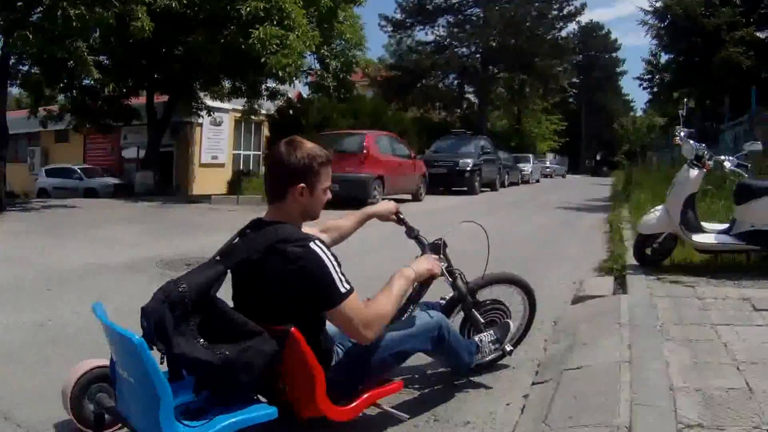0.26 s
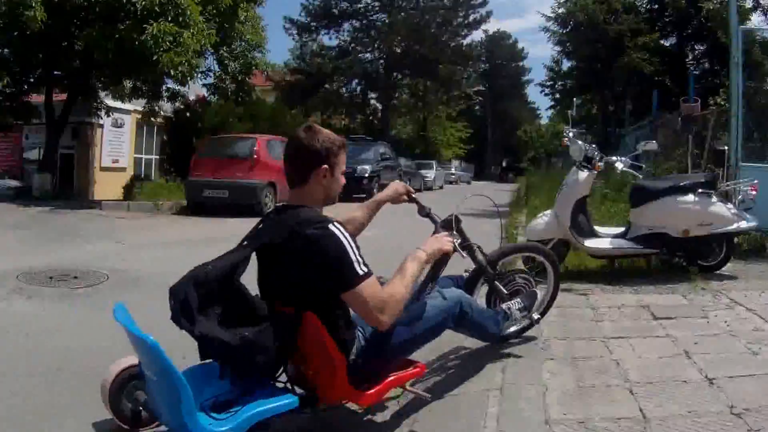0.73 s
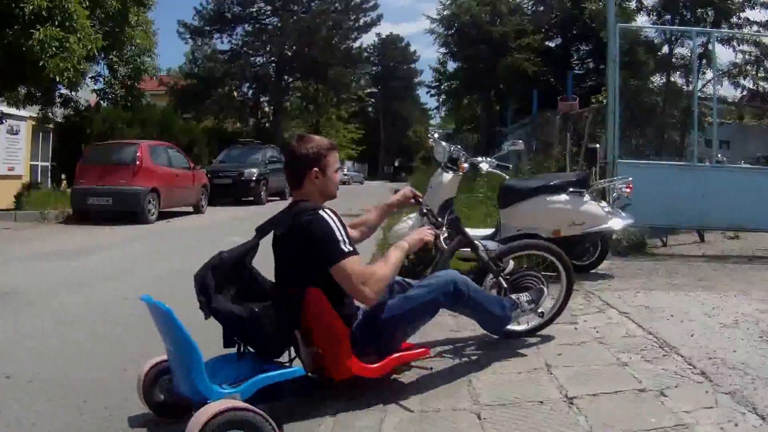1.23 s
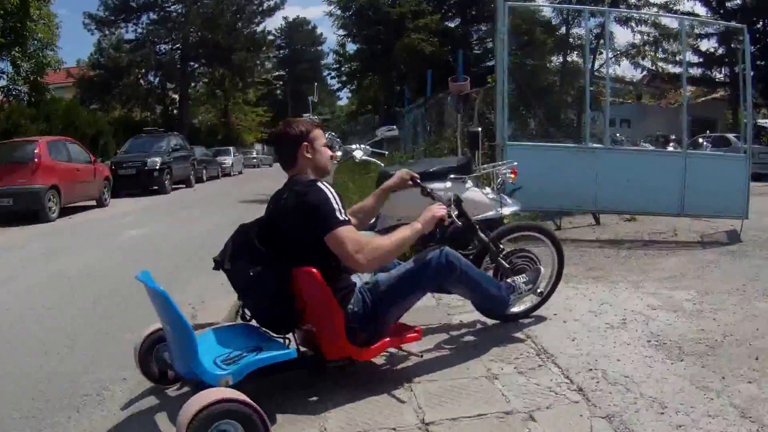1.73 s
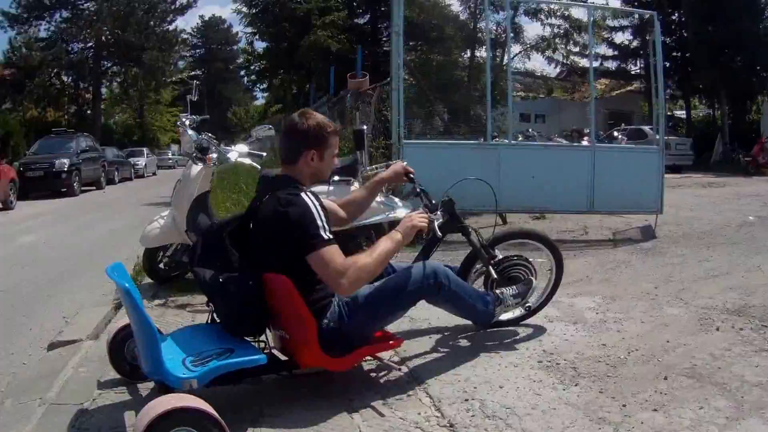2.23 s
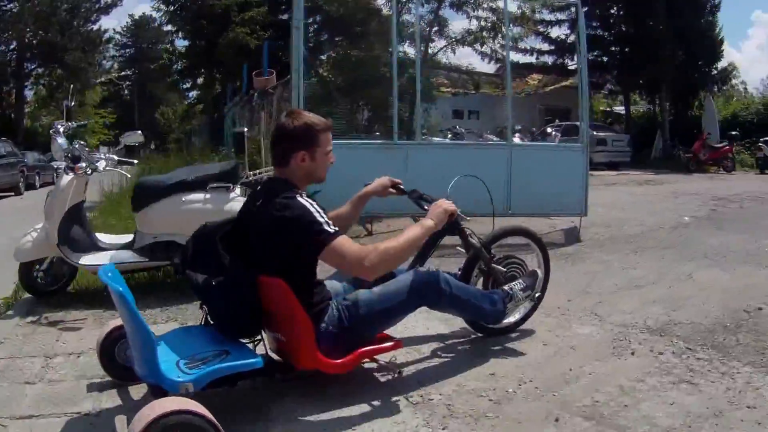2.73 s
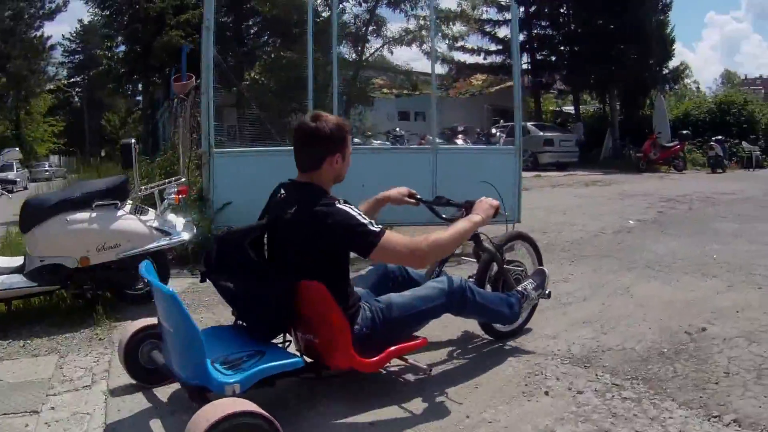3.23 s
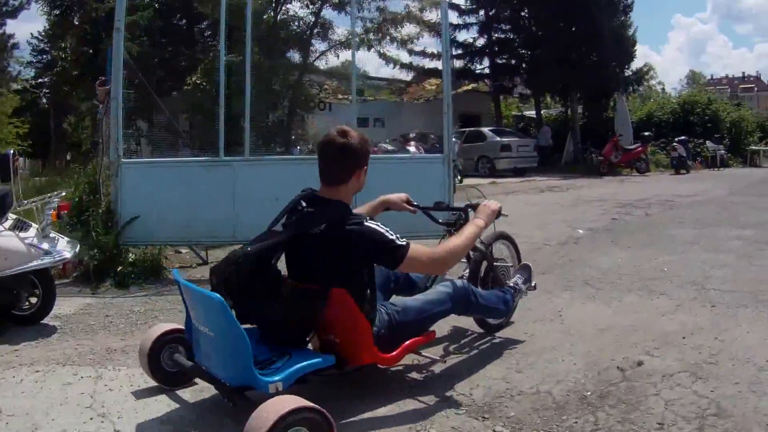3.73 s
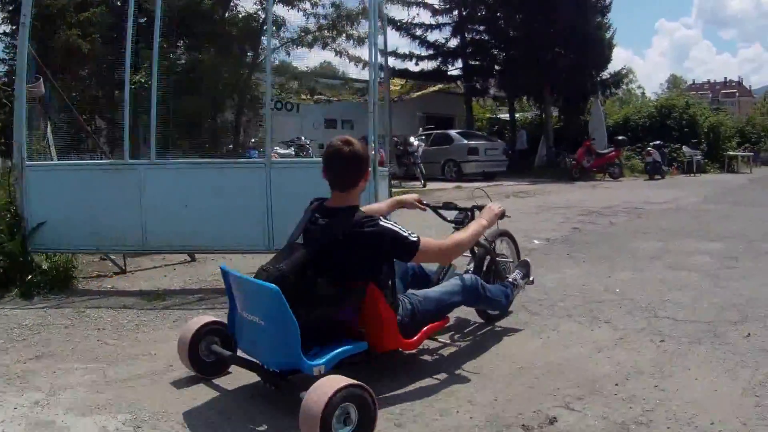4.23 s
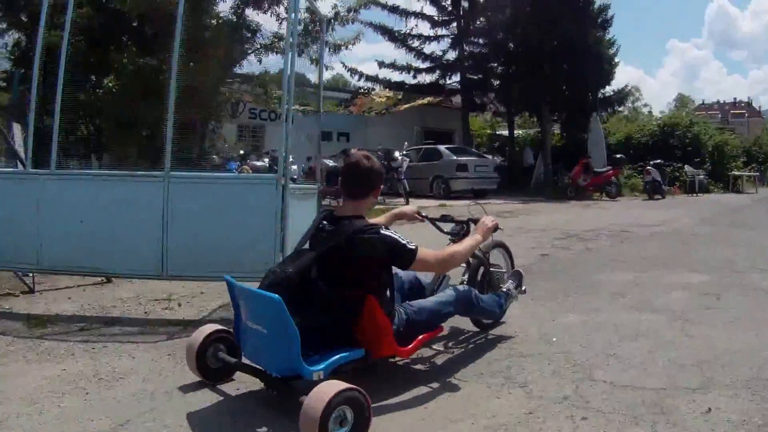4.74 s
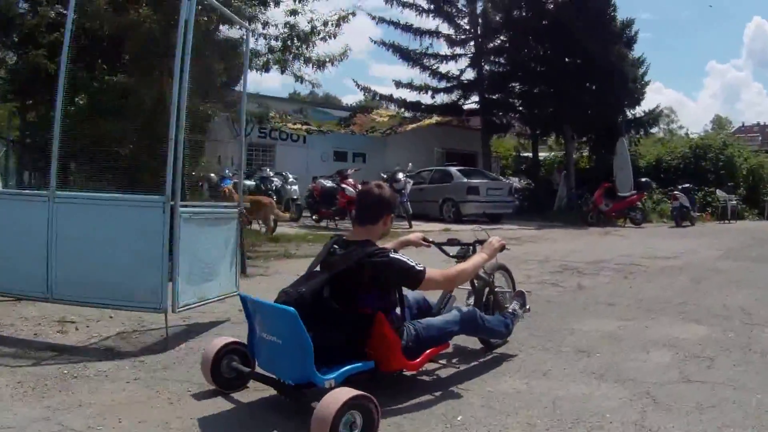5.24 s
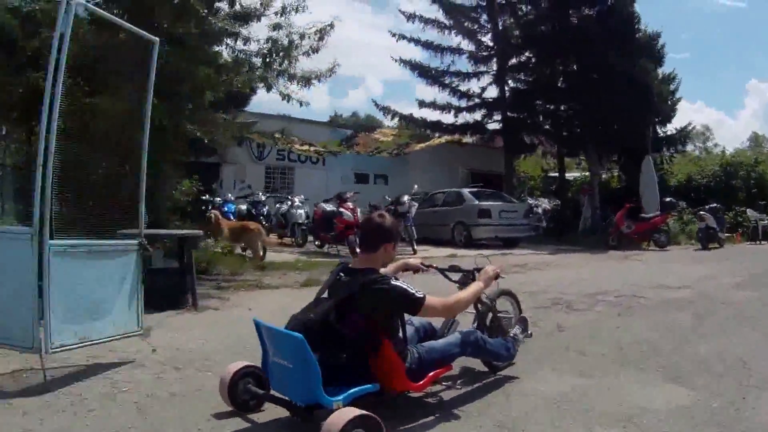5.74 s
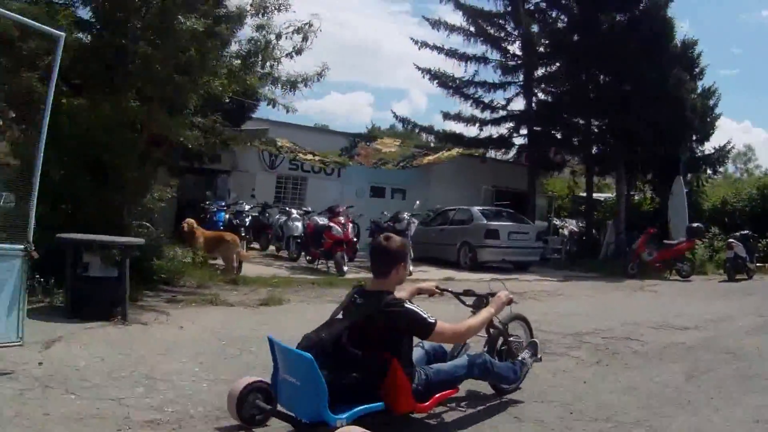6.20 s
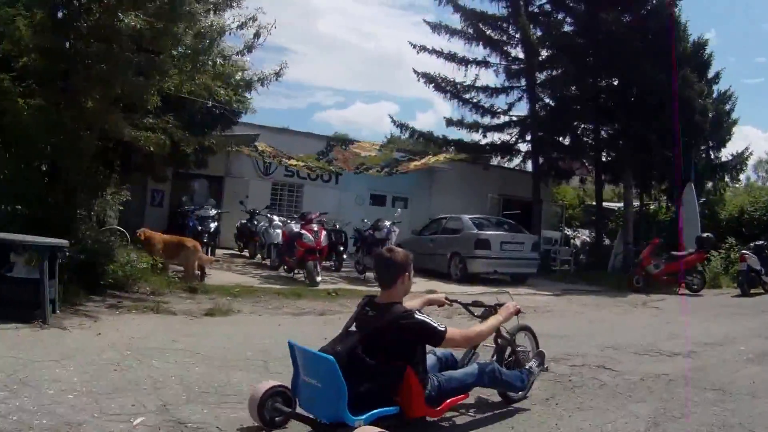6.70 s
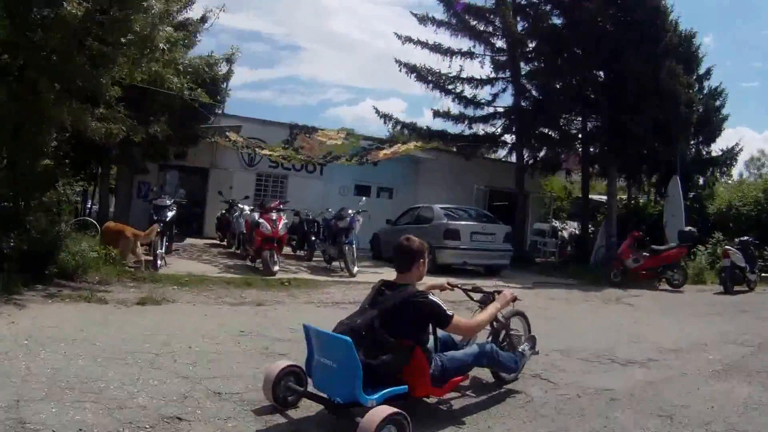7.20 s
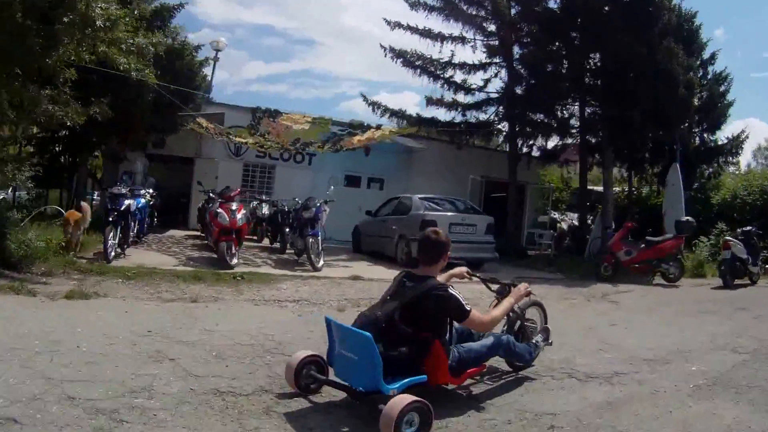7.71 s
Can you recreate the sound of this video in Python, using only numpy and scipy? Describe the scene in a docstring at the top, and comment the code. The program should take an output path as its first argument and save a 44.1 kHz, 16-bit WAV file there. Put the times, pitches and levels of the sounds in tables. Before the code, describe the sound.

A trike on hard hollow plastic wheels rolls slowly over paving then gritty asphalt, with boxy knocks, grit cracks and sandy crackle in an open lot.

```python
"""A trike on hard hollow plastic wheels rolls slowly over paving and gritty asphalt, a few steps away.
Bumps push the wheels, whose modes ring as decaying sines; smaller taps keep the same modes rumbling.
Grit cracks and fine sand crackles, both as noise through resonances; a scrap of metal pings once.
Behind it the open lot hums as shaped noise, with a low drone and a thin whine near 8 kHz."""
import sys
import numpy as np
from scipy import signal
from scipy.fft import rfft, irfft
from scipy.io import wavfile
from scipy.ndimage import uniform_filter1d

SR = 44100
rng = np.random.default_rng(int(sys.argv[2]) if len(sys.argv) > 2 else 0)


def file_out(sig):
    """Save sig as 16-bit WAV at sys.argv[1]."""
    # one column per channel
    cols = np.atleast_2d(sig).T
    # limit, then scale
    lim = np.clip(cols, -1, 1)
    pcm = np.round(lim * 32767).astype(np.int16)
    wavfile.write(sys.argv[1], SR, pcm)


N = 351036  # length in samples

# Ways the hollow wheel likes to ring. Each row: pitch in Hz, strength in dB against the other rows,
# time in seconds to fade by 60 dB (knocks fade a little faster, the rumble uses it to set its widths).
WHEEL_MODES = [(274, -29, 0.037), (410, -53, 0.0088), (468, 4, 0.031), (524, 0.5, 0.021),
               (678.3, 8.5, 0.035), (790, 2.5, 0.047), (914, 10.5, 0.01), (1152, 4.5, 0.036),
               (1502, 6, 0.02), (1800, 7.5, 0.005), (2200, -18, 0.017)]
# The larger bumps that knock the wheels.
# Each row: start in seconds, peak in dB before the bass is cut, pitch heard in Hz.
LARGE_BUMPS = [(0.057, -26, 730), (0.218, -33, 930), (0.474, -20.5, 760), (0.642, -22, 600),
               (0.892, -25.5, 630), (1.029, -4, 645), (1.0295, -10, 1930), (1.038, -18.5, 890),
               (1.065, -23, 700), (1.086, -27, 724), (1.224, -15.5, 680), (1.489, -24, 545),
               (1.581, -6, 650), (1.598, -24, 646), (1.612, -4.5, 566), (1.636, -35, 520),
               (1.662, -13.5, 540), (1.712, -14.5, 525), (1.729, -19, 540), (1.916, -33, 1040),
               (2.013, -36, 1130), (2.112, -33, 1120), (2.21, -27, 1130), (2.248, -27.5, 625),
               (2.259, -27, 680), (2.349, -30.5, 1150), (2.484, -31, 910), (2.631, -29.5, 730),
               (2.828, -27.5, 560), (2.892, -28, 560), (3.154, -17.5, 746), (3.163, -7, 643),
               (3.173, -7.5, 666), (3.409, -19, 990), (3.447, -22, 756), (3.58, -16.5, 750),
               (3.628, -25, 695), (3.724, -11, 635), (3.748, -10, 640), (3.832, -8.5, 600),
               (3.848, -30, 652), (3.869, -8.5, 590), (4.121, -22.5, 620), (4.139, -16.5, 670),
               (4.147, -29, 740), (4.158, -13, 565), (4.167, -20, 704), (4.264, -21.5, 720),
               (4.306, -13, 620), (4.316, -25, 720), (4.576, -12.5, 540), (4.586, -16, 670),
               (4.953, -13.5, 636), (5.101, -13, 564), (5.113, -29, 716), (5.233, -21, 640),
               (5.251, -18.5, 850), (5.27, -24, 710), (5.783, -20, 580), (5.799, -20.5, 680),
               (5.823, -15, 645), (6.065, -16.5, 716), (6.117, -22, 790), (6.179, -13, 640),
               (6.196, -5.5, 580), (6.252, -14.5, 600), (6.281, -20, 580), (6.409, -23.5, 700),
               (6.428, -5.5, 664), (6.438, -21, 670), (6.63, -18, 470), (6.942, -9.5, 600), (7.31, -9, 640),
               (7.387, -16.5, 596), (7.396, -8.5, 634), (7.444, -13.5, 595), (7.453, -14.5, 656),
               (7.462, -16.5, 600), (7.574, -8, 660), (7.644, -18, 530), (7.702, -20.5, 536),
               (7.752, -20.5, 560), (7.818, -23.5, 660), (7.831, -20, 716), (7.865, -9.5, 640),
               (7.902, -21, 660)]
PUSH_MS, PUSH_AT_HZ = 0.22, 655  # width of the push for a bump of this pitch


def knocks(rumble_db):
    """Each bump pushes the wheel and rings mostly the modes near its pitch; also gives the shudder after it."""
    bumps = LARGE_BUMPS + small_bumps(rumble_db)
    out, shudder = np.zeros(N), np.zeros(N)
    t = np.arange(int(.1 * SR)) / SR
    hz, mode_db, t60 = np.transpose(WHEEL_MODES)[:, :, None]
    chance = rng.standard_normal((len(bumps), 2, len(WHEEL_MODES), 1))
    for (s, db, pitch_hz), (detune, uneven) in zip(bumps, chance):
        octaves_away = np.log2(hz / pitch_hz)
        near_db = -9.5 * np.minimum(octaves_away ** 2, 1.5) + 3 * uneven
        tones = np.sin(2 * np.pi * hz * (1 + 0.082 * detune) * t)
        ring = np.sum(undb(mode_db + near_db) * tones * fade(t, t60), axis=0)
        ring *= .4 + fade(t, .05)
        # a sharper edge pushes more briefly and sounds higher
        width_s = max(PUSH_MS * PUSH_AT_HZ / pitch_hz, .03) / 1000
        push = np.exp(-.5 * (t[:int(5 * width_s * SR)] / width_s - 2.5) ** 2)
        pushed = np.convolve(ring, push)
        knock = np.diff(pushed, prepend=0)  # a small body radiates the rate of change
        add(out, s - .0002, undb(db) * knock / np.abs(knock).max())
        add(shudder, s, undb(db - 28) * (1 - np.exp(-t / .004)) * fade(t, .08))
    return out, shudder


SMALL_BUMPS = 40  # how many
SMALL_BUMP_DB, SMALL_BUMP_HZ = 14.5, 650  # usual peak over the rumble level, usual pitch


def small_bumps(rumble_db):
    """Lesser bumps fall at random, more often where the rumble is loud and a little over it."""
    s, db = scatter(rumble_db, count=SMALL_BUMPS)
    size, pitch = rng.standard_normal((SMALL_BUMPS, 2)).T
    return list(zip(s, db + SMALL_BUMP_DB + 1.4 * size, SMALL_BUMP_HZ * np.exp(.15 * pitch)))


def rumble(gain):
    """Small unevenness of the road keeps tapping the same wheel modes with soft pushes."""
    push = signal.windows.gaussian(128, 0.00016 * SR)
    road = grains(per_s=200, spread_db=2.2) + .25 * rng.standard_normal(N)
    taps = np.convolve(road, push)[:N]
    ring = np.zeros(N)
    for hz, db, t60 in WHEEL_MODES:
        wander_db = 1.18 * walk(30)
        ring += undb(db + wander_db) * steep_band(taps, hz, 6.3 / t60)
    return level(ring, 0) * gain


THRUM_HZ, THRUM_WIDTH_HZ, THRUM_DB = 157.5, 150, -13.5  # level in dB against the rumble


def thrum(rumble_db):
    """Low shake of the frame: a band of low noise that follows the rumble level."""
    return undb(rumble_db + THRUM_DB) * narrow(THRUM_HZ, THRUM_WIDTH_HZ)


# How grit rings, as a low, a middle and a high group of resonances.
# Each row in a group: pitch in Hz, width in Hz, strength in dB against the other rows of its group.
GRIT_GROUPS = [
    [(1292, 840, 3), (2530, 1050, 2.5), (3093, 1090, 6), (3480, 346, 2.5)],
    [(5427, 1030, 4.5), (5970, 1120, 1)],
    [(8330, 1200, -16.5), (9790, 2300, -2), (11300, 840, -10.5), (14000, 1400, -13.5)],
]
# Larger stones cracking under the tread. Each row: start in seconds,
# level in dB of the loudest group (its peak is 3 dB higher),
# brightness in dB (the high group gains it, the low group loses it).
LARGE_STONES = [(0.058, -38, -4.5), (0.18, -37.5, -5), (0.2151, -39.5, 2), (0.2255, -34.5, -15),
                (0.2754, -35, 8), (0.3962, -8, 9), (0.4875, -29.5, -9), (0.5452, -24.5, -1),
                (0.7666, -30.5, 4.5), (0.8613, -27.5, 3), (0.953, -36, -3), (1.0285, -22, -8.5),
                (1.2334, -35, -26), (1.5904, -32, -0.5), (1.6118, -32, -8), (1.7682, -27.5, -0.5),
                (1.8405, -37, -0.5), (2.2107, -26.5, -21), (2.2463, -36, 0), (2.361, -40, -5),
                (2.373, -32, -1), (2.5556, -31, -7.5), (2.591, -30.5, -5), (2.6307, -26.5, -8),
                (2.6482, -29, -3.5), (2.7292, -31.5, -3.5), (2.8894, -28, -2.5), (2.9681, -25.5, -5),
                (2.9787, -29.5, -11), (3.1231, -25.5, 1.5), (3.1318, -24.5, -8), (3.142, -22, -17),
                (3.1557, -27.5, -3.5), (3.2077, -30.5, -5.5), (3.2865, -25, -12), (3.3393, -29, -8),
                (3.399, -29, 3), (3.4089, -16.5, -3.5), (3.4482, -20.5, -4.5), (3.4708, -32, -1),
                (3.486, -31, -15), (3.5024, -19, -12), (3.5327, -24.5, -3), (3.5801, -20, -3),
                (3.651, -32.5, 15), (3.672, -24.5, -2), (3.7074, -19.5, -9.5), (3.7297, -20, -12),
                (3.7845, -31, 6), (3.832, -25, -17), (3.8608, -18, -1.5), (3.8754, -31, 11),
                (3.9149, -15.5, -6.5), (3.9696, -33, -5), (3.9787, -25, -6), (4.0174, -20.5, -2.5),
                (4.0539, -18.5, -6), (4.0893, -40, 11), (4.0989, -31, -1), (4.106, -25, -14),
                (4.125, -35, -16), (4.1327, -27.5, -2.5), (4.2721, -24.5, -4.5), (4.2875, -25, -3),
                (4.3146, -17.5, -3.5), (4.3788, -19.5, -7), (4.3855, -30, -11), (4.6432, -26, -6),
                (4.6588, -26, -3.5), (4.6863, -22, 0), (4.7567, -24.5, -3), (4.764, -21.5, -3.5),
                (4.799, -25.5, -3), (4.8152, -30, -4), (4.8537, -20, -5), (4.8669, -21.5, -5),
                (4.8949, -17.5, -5.5), (4.9207, -25, -3), (5.017, -34, 3), (5.0409, -25.5, -6),
                (5.06, -25.5, -6), (5.078, -34, -1), (5.102, -23, -5.5), (5.121, -24.5, -6.5),
                (5.158, -23.5, -4), (5.2206, -23.5, -4.5), (5.2512, -31, -2), (5.2877, -29.5, -2.5),
                (5.3854, -25.5, 0), (5.718, -20, -7.5), (5.7236, -22, -4.5), (5.7812, -15, -5),
                (5.8085, -23.5, -8), (5.9565, -25, -2.5), (6.116, -21, -9), (6.173, -31.5, 0),
                (6.197, -26, -10), (6.2728, -26, -5), (6.378, -29.5, -2.5), (6.4177, -27, -6),
                (6.5461, -18, -3), (6.554, -21.5, -4), (6.6005, -22.5, -5), (6.6106, -24, -6),
                (6.759, -40, 3), (6.894, -37.5, -3), (6.9066, -31.5, -10), (7.051, -28, -6),
                (7.09, -28, -5.5), (7.168, -32.5, -4), (7.1936, -31, -6.5), (7.2644, -28.5, -5.5),
                (7.3339, -26.5, -14), (7.4914, -28, -3.5), (7.5172, -31, -19), (7.5612, -31, 2),
                (7.5735, -30, -18), (7.69, -29, -12), (7.806, -33, -12), (7.8457, -30, -13),
                (7.9228, -32, -7)]
MIDDLE_DB, COLOUR_SPREAD_DB = 1.5, 2.5  # usual level of the middle group and its random spread
CRUMBLE_T60_S, CRUMBLE_SPREAD = .027, .2  # usual fade time and its random spread (as a logarithm)


def stones(sand_db):
    """A stone snaps, then crumbles for some milliseconds: bursts of noise ring the grit groups."""
    cracks = LARGE_STONES + small_stones(sand_db)
    t = np.arange(int(.045 * SR)) / SR
    out = np.zeros(N)
    chance = rng.standard_normal((len(cracks), len(GRIT_GROUPS) + 1, len(t)))
    kinds = rng.standard_normal((len(cracks), 2))
    for (s, loudest_db, bright_db), (lumps, *noises), (length, colour) in zip(cracks, chance, kinds):
        group_db = np.array([-bright_db, MIDDLE_DB + COLOUR_SPREAD_DB * colour, bright_db])
        group_db += loudest_db - group_db.max()
        t60 = CRUMBLE_T60_S * np.exp(CRUMBLE_SPREAD * length)
        lumpy = undb(12 * uniform_filter1d(lumps, size=30))
        crumbling = .3 * fade(t, max(t60, .003)) * lumpy
        snap = fade(t, .003)
        shape = (1 - np.exp(-t / .0003)) * (snap + crumbling)
        for group, db, noise in zip(GRIT_GROUPS, group_db, noises):
            ring = ring_grit(noise * shape, group)
            add(out, s - .0002, undb(db) * np.sqrt(2) * ring / np.abs(ring).max())
    return out


SMALL_STONES = 130  # how many
SMALL_STONE_DB, SMALL_STONE_BRIGHT_DB = 9.5, -5  # usual level over the sand, usual brightness


def small_stones(sand_db):
    """Lesser stones crack at random, more often where the sand is loud and a little over it."""
    s, db = scatter(sand_db, count=SMALL_STONES)
    size, colour = rng.standard_normal((SMALL_STONES, 2)).T
    return list(zip(s, db + SMALL_STONE_DB + 0.83 * size, SMALL_STONE_BRIGHT_DB + 4 * colour))


def ring_grit(x, group):
    """One group of steep grit resonances, all set ringing by the same sound."""
    return sum(undb(db) * steep_band(x, hz, width_hz) for hz, width_hz, db in group)


# How loud the sand is in the low, middle and high grit group. Each entry: level in dB against the sand level.
SAND_GROUP_DB = [-2, -6, -7]
SAND_DULLS_DB_PER_S = 0.5  # each higher group fades by this much more as the trike rolls away


def sand(sand_db):
    """Fine sand crackles in random puffs of noise, partly shared by the groups and partly their own."""
    out = np.zeros(N)
    shared = sand_puffs(0)
    for step, (db, group) in enumerate(zip(SAND_GROUP_DB, GRIT_GROUPS)):
        dull_db = -SAND_DULLS_DB_PER_S * step * np.arange(N) / SR
        puffs = shared + sand_puffs(-3.0) + .25
        crackle = level(ring_grit(puffs * rng.standard_normal(N), group), db)
        out += crackle * undb(sand_db + dull_db + 1.3 * walk(25))
    return out


def sand_puffs(db):
    """Loudness curve of short puffs from fine grains, each rising fast and dying away."""
    t = np.arange(int(.02 * SR)) / SR
    crumble = (1 - np.exp(-t / 0.00075)) * fade(t, .013)
    return level(signal.fftconvolve(np.abs(grains(per_s=160, spread_db=1.5)), crumble)[:N], db)


# The ring of a struck scrap of metal.
# Each row: pitch in Hz, peak level in dB, time in seconds to fade by 60 dB.
PING_MODES = [(11600, -53, .3), (13200, -72, 0.61), (14285, -51, .3), (15000, -57, .3)]
PING_S = 7.264  # start in seconds


def ping():
    """A scrap of metal is struck once: a few high modes start together and fade as sines."""
    out, t = np.zeros(N), np.arange(SR // 2) / SR
    ring = sum(undb(db) * np.sin(2 * np.pi * hz * t) * fade(t, t60) for hz, db, t60 in PING_MODES)
    add(out, PING_S, ring)
    return out


# Tone colour of the open lot. Each row: frequency in Hz, strength per Hz in dB against the other rows.
LOT_COLOUR = [(20, -12.5), (50, -8.5), (100, -12.5), (200, 3), (450, 2), (1000, -3), (1400, -11),
              (2000, -19.5), (3500, -11.5), (7000, -20.5), (12000, -20.5), (15500, -27)]
LOT_DB = -51  # overall rms level


def lot_hum():
    """Distant hum of the open lot: noise shaped by frequency, swelling faintly and slowly."""
    hz, db = np.transpose(LOT_COLOUR)
    f = np.maximum(np.fft.rfftfreq(N, 1 / SR), 1)
    colour = undb(np.interp(np.log(f), np.log(hz), db))
    air = irfft(rfft(rng.standard_normal(N)) * colour, N)
    return level(air, LOT_DB) * undb(0.13 * walk(3.47))


# Noise bands of the thin whine. Each row: pitch in Hz, width in Hz.
WHINE_BANDS = [(8333, 8), (7870, 350), (8350, 250), (6100, 350)]
# Loudness of those bands, in the same order. Each entry: rms level in dB.
WHINE_BAND_DB = [-72.5, -65.5, -67.5, -66]
# Steady tones in the whine. Each row: pitch in Hz, rms level in dB.
WHINE_SINES = [(7838, -70), (7897, -69), (8361.5, -65)]


def whine():
    """Thin steady whine: narrow bands of noise and a few pure tones."""
    t = np.arange(N) / SR
    bands = sum(undb(db) * narrow(hz, width_hz) for (hz, width_hz), db in zip(WHINE_BANDS, WHINE_BAND_DB))
    tones = sum(undb(db) * np.sqrt(2) * np.sin(2 * np.pi * hz * t) for hz, db in WHINE_SINES)
    return bands + tones


# How the low drone rises and falls. Each row: time in seconds, level in dB.
DRONE_LEVEL = [(0, -76), (2, -68.5), (3.3, -70), (4.5, -62), (5.499, -74), (6.3, -64), (7.3, -61.5),
               (7.96, -57)]


def drone():
    """Low drone: a narrow band of noise around 73 Hz, following a level curve."""
    gain = undb(np.interp(np.arange(N) / SR, *np.transpose(DRONE_LEVEL)))
    return gain * narrow(hz=73, width_hz=14)


def undb(db):
    """Gain of a level in dB."""
    return 10 ** (np.asarray(db) / 20)


def level(x, db):
    """Set the rms level."""
    return x * undb(db) / np.sqrt(np.mean(x ** 2))


def band(x, hz, width_hz):
    """Resonance with gain 1 at its centre."""
    return signal.lfilter(*signal.iirpeak(hz, hz / width_hz, fs=SR), x)


def steep_band(x, hz, width_hz):
    """The same resonance twice, for steeper sides."""
    return band(band(x, hz, width_hz), hz, width_hz)


def narrow(hz, width_hz):
    """Noise in a steep band, rms 1."""
    return level(steep_band(rng.standard_normal(N), hz, width_hz), 0)


def add(track, s, sound):
    """Mix a short sound into a track at s seconds."""
    i = int(s * SR)
    track[i:i + len(sound)] += sound[:N - i]


def fade(t, t60):
    """Decay of 60 dB in t60 seconds."""
    return np.exp(-np.log(1000) * t / t60)


def walk(rate):
    """Random levels, a new one every 1 / rate seconds, smoothed twice; spread near 1."""
    k = int(SR / rate)
    steps = np.repeat(rng.standard_normal(N // k + 1), k)
    return 2.4 * uniform_filter1d(uniform_filter1d(steps, k), k)[:N]


def grains(per_s, spread_db):
    """Scattered clicks of random sign and size, rms 1."""
    hit = rng.random(N) < per_s / SR
    size = rng.exponential(size=N)
    sign = rng.standard_normal(N)
    return level(hit * sign * undb(spread_db * np.minimum(size, 3.0)), 0)


def scatter(db, count):
    """Random moments, denser where the level is high, with the level there."""
    share = np.cumsum(undb(db))
    i = np.searchsorted(share, (np.arange(count) + rng.random(count)) / count * share[-1])
    i = np.minimum(i, N - 1)
    return i / SR, db[i]


def with_echo(dry_trike):
    """Short echo from ground and fence: a fading burst of noise smears the sound."""
    t = np.arange(int(.2 * SR)) / SR
    echo = rng.standard_normal(len(t)) * fade(t, .12) * (1 - np.exp(-t / .003))
    echo = signal.lfilter([1], [1, -.6], echo)  # rough ground returns less treble
    echo /= np.sqrt(np.sum(echo ** 2))
    return dry_trike + undb(-18.0) * signal.fftconvolve(dry_trike, echo)[:N]


# How strongly the trike rolls. Each row: time in seconds, wheel rumble in dB before the bass is cut,
# sand crackle in dB.
ROLLING = [(0.0, -48, -57), (0.53, -45.5, -52), (1.66, -50.5, -55), (2.04, -57, -59.5), (2.84, -49, -48.5),
           (3.26, -46, -52), (3.64, -42, -42), (3.97, -42, -41.5), (4.57, -46.5, -51), (4.94, -46.5, -42),
           (5.12, -43.5, -45.5), (5.45, -48, -52), (5.76, -48, -49.5), (5.99, -40, -49), (7.0, -44, -51),
           (7.34, -43, -46), (7.54, -42, -49), (7.96, -44, -53)]


def scene():
    """The trike with its short echo, and the lot behind it."""
    s, *columns = np.transpose(ROLLING)
    rumble_db, sand_db = (np.interp(np.arange(N) / SR, s, column) for column in columns)
    patchy_db = 1.4 * walk(25)  # rough patches raise rumble and crackle together
    knock, shudder = knocks(rumble_db)
    wheels = knock + rumble(undb(rumble_db + patchy_db) + shudder)
    # a small wheel radiates little bass
    wheels = signal.sosfilt(signal.butter(4, 290., "high", fs=SR, output="sos"), wheels)
    trike = wheels + thrum(rumble_db) + stones(sand_db) + sand(sand_db + patchy_db) + ping()
    return (with_echo(trike) + lot_hum() + whine() + drone())[None]


def record(dry):
    """A steep low-pass filter cuts the treble above 15450 Hz."""
    return signal.sosfilt(signal.ellip(8, .2, 70, 15450, fs=SR, output="sos"), dry)


dry = scene()
out = record(dry)
file_out(out)
```